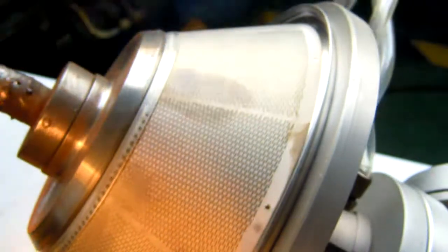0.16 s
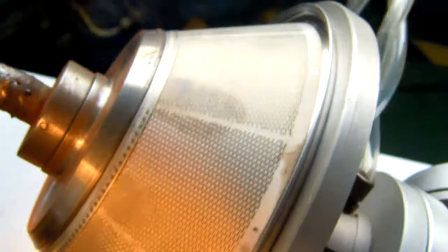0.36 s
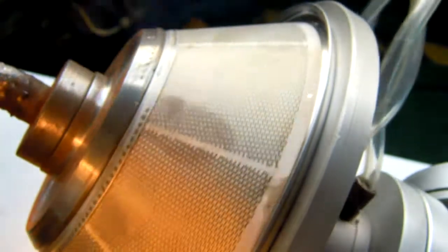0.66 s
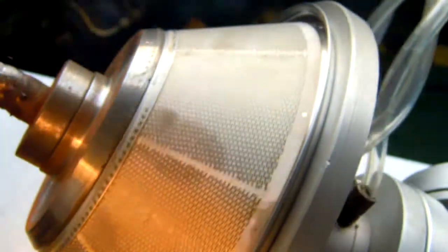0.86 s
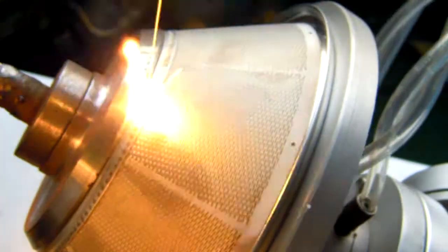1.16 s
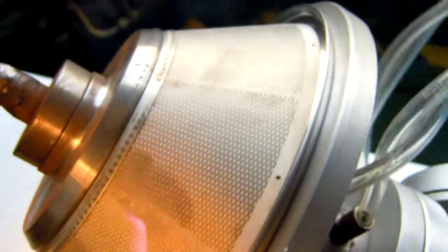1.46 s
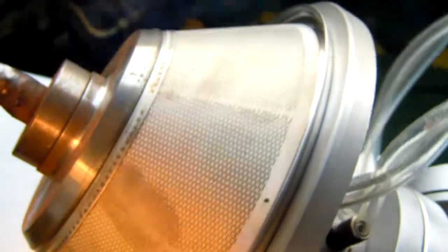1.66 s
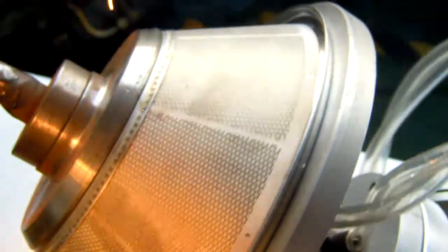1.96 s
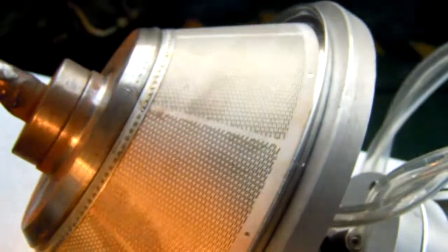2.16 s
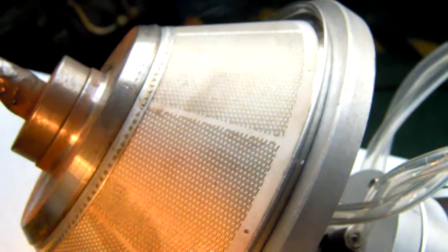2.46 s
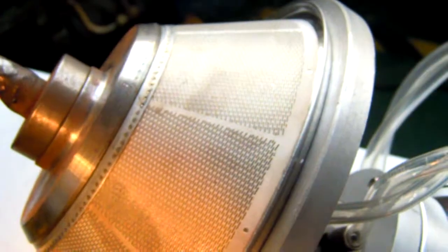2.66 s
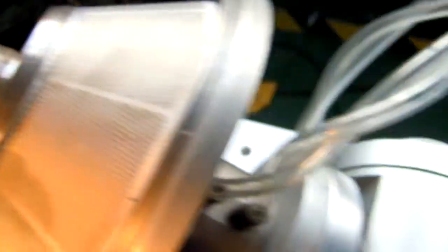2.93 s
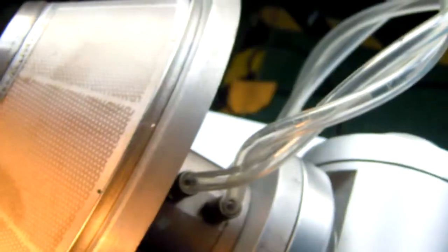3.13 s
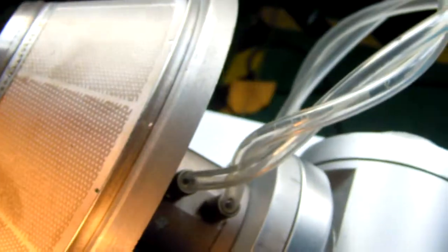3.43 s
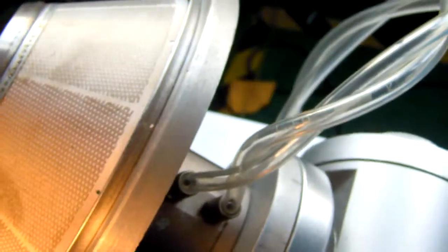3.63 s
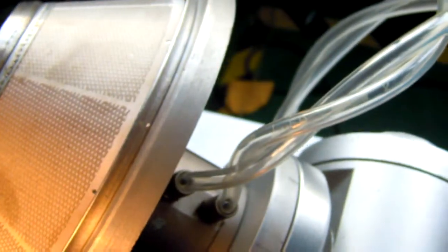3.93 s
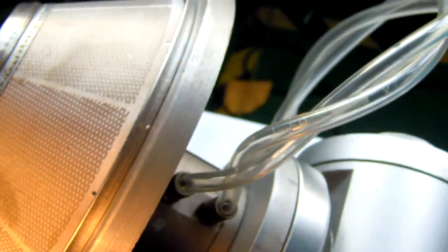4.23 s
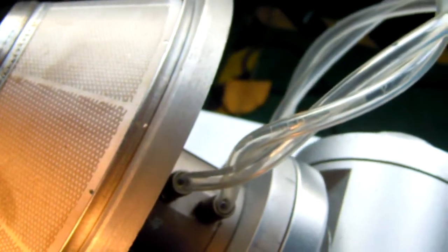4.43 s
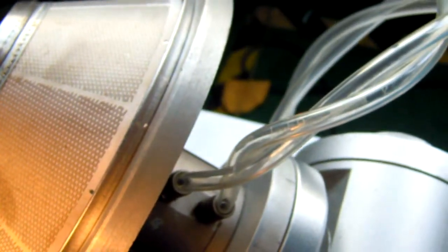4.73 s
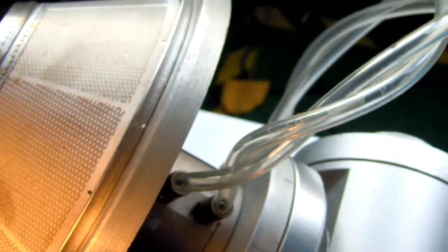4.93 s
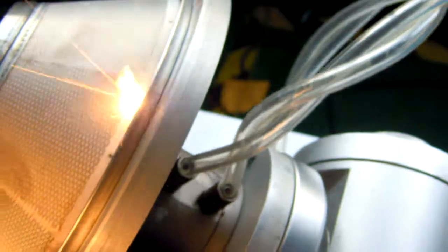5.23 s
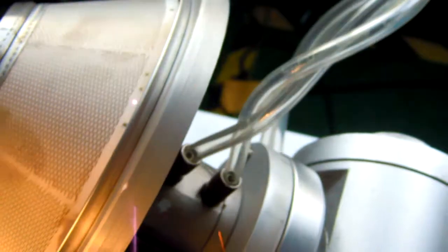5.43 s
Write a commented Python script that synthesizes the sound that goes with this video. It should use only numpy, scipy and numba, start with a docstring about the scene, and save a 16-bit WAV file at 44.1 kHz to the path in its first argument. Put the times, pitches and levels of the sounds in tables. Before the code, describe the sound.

A close mono microphone in a workshop hears a machine-gun-even run of dry, crisp welding snaps with the background pushed down. After a metallic clack, steady fan hum, a high thin whine and airy gas hiss grow louder, with soft low rumble and a few tiny metal clicks. Another clack, then three loud, distorted ticks with a bright metallic ring end it.

```python
"""Pulsed laser welding of a mesh cone

A laser welds a steel mesh cone close by: nine sharp ticks a second, noise bursts shaped by each beam pulse.
The shutter clacks shut; the gain control lifts the fans (tones, colored noise) and the comb-filtered gas hiss.
The shutter opens; the next ticks, on the cone's rim, ring brightly (noise bands, sines) and overload the input."""
import sys
import numpy as np
from scipy import signal
from scipy.fft import rfft, irfft, next_fast_len
from scipy.io import wavfile
from scipy.ndimage import uniform_filter1d, map_coordinates
from numba import njit

SR = 44100
rng = np.random.default_rng(int(sys.argv[2]) if len(sys.argv) > 2 else 0)


def wav_out(sig):
    """Save sig, one row per channel (or a flat mono array), as 16-bit PCM at SR to the path in sys.argv[1]."""
    wavfile.write(sys.argv[1], SR, np.round(np.clip(np.atleast_2d(sig).T, -1, 1) * 32767).astype(np.int16))


N = 246519
T = np.arange(N) / SR
SHOT_PERIOD_S = 0.107544

# welding runs, on the seam, then on the rim: (first shot [s], last shot [s], sizzle before its trim [dB],
# plume pop [dB], mesh ring [dB], rim ring [dB])
WELD_RUNS = [(0.0834, 2.019, 12, 10, -28, -2), (5.3437, 5.559, 10.5, -10, -2.5, 15.5)]


def amp(db):
    """Decibels to amplitude."""
    return 10 ** (np.asarray(db) / 20)


def unit(x):
    """x scaled to rms 1."""
    return x / np.sqrt(np.mean(x ** 2) + 1e-20)


def along(points, hz):
    """(Hz, value) points interpolated on a log frequency axis."""
    f, v = np.transpose(points)
    return np.interp(np.log(hz + 1), np.log(f + 1), v)


def wobble(rate):
    """Smooth random curve, rate knots a second."""
    return map_coordinates(rng.standard_normal(int(N * rate / SR) + 4), [T * rate])


def filtered(x, response):
    """x times a response of frequency."""
    m = next_fast_len(len(x) + 8192)
    spectrum = rfft(x, m) * response(np.fft.rfftfreq(m, 1 / SR))
    return irfft(spectrum, m)[:len(x)]


def noise(spectrum, size=N):
    """Noise of rms 1 with a (Hz, dB) color."""
    return unit(filtered(rng.standard_normal(size), lambda f: amp(along(spectrum, f))))


def band(hz, width, size):
    """Noise of rms 1 in one resonance; amplitude halves at width Hz off center."""
    return unit(filtered(rng.standard_normal(size), lambda f: 1 / (1 + ((f - hz) / width) ** 2)))


def add(track, s, sound):
    """Mix a sound into the track at time s."""
    part = track[max(round(s * SR), 0):][:len(sound)]
    part += sound[:len(part)]


def fade(t, t60):
    """Decay that loses 60 dB in t60 seconds; silent before time zero."""
    return (t >= 0) * np.exp(-np.log(1000) * np.abs(t) / t60)


def firing(first, last):
    """1 while the lamp is fed for a run of shots, else 0."""
    return (T > first - SHOT_PERIOD_S) & (T < last + SHOT_PERIOD_S / 2)


def load(lag_s):
    """Power drawn by the laser, 0-1, through a one-pole lag."""
    drawn = sum(firing(first, last) for first, last, *_ in WELD_RUNS)
    keep = np.exp(-1 / (lag_s * SR))
    return signal.lfilter([1 - keep], [1, -keep], drawn, zi=[keep * drawn[0]])[0]


def low_rumble():
    """Soft low rumble, steady with two swells: colored noise under Gaussian bumps."""
    # swells: (middle [s], length [s], level [dB])
    swells = [(2.477, 0.71, -31.5), (3.182, 0.075, -35)]
    steady_db = -44
    level = amp(steady_db)
    for s, length, db in swells:
        level = level + amp(db) * np.exp(-(2 * (T - s) / length) ** 2)
    return level * noise([(20, 0.5), (60, -5.0), (160, -5.5), (260, -10), (600, -30), (2000, -81.0)])


def machine():
    """Fans hum, whine and rush, sagging under load; cone and nozzle reflections comb the gas hiss."""
    # steady fan and pump tones: (frequency at idle [Hz], level relative to the others [dB])
    fan_tones = [(200.1, -40.5), (260.8, -37.5), (281.1, -39), (562.2, -40.5), (702.7, -41), (796, -43.5),
                 (843.2, -36), (1043.4, -46), (1090, -50), (1124.3, -42.5), (1452.9, -53.5), (2202, -47.5),
                 (2248.6, -56)]
    # color of the fans' air rush: (frequency [Hz], level [dB])
    rush_color = [(15, -35), (25, -12.5), (133, -11), (192, -6), (229, -10), (278, -1), (418, -10.5),
                  (571, -5.5), (750, -7.5), (826, -10), (893, -7), (1220, -11), (1370, -8), (1540, -11.5),
                  (2600, -24.5), (3380, -19), (5720, -120)]
    # color of the shield gas hiss: (frequency [Hz], level [dB])
    gas_color = [(900, -25), (2000, -1.5), (2550, -5), (3400, 1.5), (4460, -1.5), (6800, -4), (9100, -3),
                 (9600, -7.5), (10300, -14.5)]
    # whine level at idle: (time [s], level [dB])
    whine_level = [(2.75, -30), (3.1, -27), (4.25, -27), (4.5, -25.5), (5.1, -23)]
    idle_whine_hz, sag_hz, fan_lag_s = 1405.4, 6.4, 0.15
    hum_db, rush_db = 2.5, -28  # idle, near the nozzle
    hum_sag_db, whine_sag_db, rush_sag_db = -3.5, -1.5, -0.5  # change under full load
    # the microphone swings from the gas nozzle towards the fans
    drift_start_s, drift_end_s, fans_closer_db = 2.27, 3.6, 1.36
    gas_near_db, gas_far_db = -26.5, -28
    # reflection strength drops, so the hollow color of the hiss fades
    mirror_fade_s, mirror_strength = [3.3, 4], [0.38, 0.06]
    mirror_delay_s, mirror_above_hz = 0.00099, 3800  # the cone is too small to reflect longer waves

    sag = load(fan_lag_s)
    drift = np.clip((T - drift_start_s) / (drift_end_s - drift_start_s), 0, 1)

    whine_hz = idle_whine_hz - sag_hz * sag
    whine_db = np.interp(T, *np.transpose(whine_level)) + whine_sag_db * sag
    whine = amp(whine_db + 1.4 * wobble(7)) * np.sin(2 * np.pi * np.cumsum(whine_hz) / SR)

    clock_s = np.cumsum(whine_hz / idle_whine_hz) / SR  # all tones follow the fan speed
    hum = np.zeros(N)
    for hz, db in fan_tones:
        phase = 2 * np.pi * (hz * clock_s + rng.random()) + 0.1 * wobble(6)
        hum += amp(db + 1.5 * wobble(8.2)) * np.sin(phase)
    hum *= amp(hum_db + hum_sag_db * sag)
    rush = amp(rush_db + rush_sag_db * sag + 0.37 * wobble(12)) * noise(rush_color)
    fans = amp(fans_closer_db * drift) * (hum + rush)
    cabinet = amp(-36.5) * band(286.2, width=6.0, size=N)  # boom

    def reflect(f):
        """Inverted, delayed, high-passed."""
        treble = 1 - 1 / (1 + (f / mirror_above_hz) ** 10)
        return -np.exp(-2j * np.pi * f * mirror_delay_s) * treble

    jet = noise(gas_color)
    once = filtered(jet, reflect)
    twice = filtered(once, reflect)
    mirrored = np.interp(T, mirror_fade_s, mirror_strength)
    combed = (jet + mirrored * once + mirrored ** 2 * twice) / np.sqrt(1 + mirrored ** 2)
    gas = amp(gas_near_db + (gas_far_db - gas_near_db) * drift) * combed
    return fans + whine + cabinet + gas


def supply():
    """Thin tone of the laser's power supply while it feeds the lamp, swelling through each run."""
    tone_hz, start_db, swell_db_per_s = 797, -42.5, 6  # start_db holds at the first shot
    level = np.zeros(N)
    for first, last, *_ in WELD_RUNS:
        level += firing(first, last) * amp(start_db + swell_db_per_s * (T - first))
    tone = np.sin(2 * np.pi * tone_hz * T + 0.33 * wobble(4.8))
    return uniform_filter1d(level, size=SR // 20) * tone


def fixture():
    """Light metal clicks as the work is shifted: decaying noise bands."""
    # clicks: (time [s], level [dB], frequency [Hz], t60 [s])
    work_clicks = [(2.838, -23, 9270, 0.11), (3.092, -16, 8060, 0.045), (3.935, -20.5, 9180, 0.19),
                   (4.467, -27, 3800, .12), (4.469, -25.5, 6800, 0.11), (5.013, -26.5, 9210, 0.18)]
    out, t = np.zeros(N), np.arange(SR // 4) / SR
    for s, db, hz, t60 in work_clicks:
        add(out, s, amp(db - 60 * t / t60) * band(hz, width=340, size=len(t)))
    return out


def shutter():
    """The solenoid clicks, its blade thumps against the stop, rattles and rings."""
    # closing, then opening: (time [s], click before its trim [dB], rattle [dB],
    # rattle start after click [s], rattle hold [s], thump before its trim [dB], ring [dB])
    blade_moves = [(2.106, -5, -1, .011, 0.0051, 1, -24), (5.1358, -7, -9, .009, 0.0074, -33, -10)]
    # color of click and rattle: (frequency [Hz], level [dB])
    clack_color = [(200, -31), (1200, -12), (1750, -4), (2500, -17), (3600, -4), (4800, -11), (5900, -0.5),
                   (7000, -4.5), (8400, 1.5), (10000, -3.5)]
    travel_s, click_trim_db, thump_trim_db = 0.007, 2.5, -10.0
    click_t60_s, thump_t60_s, rattle_t60_s, ring_t60_s = 0.05, 0.12, 0.18, 0.28
    out, t = np.zeros(N), np.arange(SR // 3) / SR
    for s, click_db, rattle_db, start, length, thump_db, ring_db in blade_moves:
        click_level = amp(click_db + click_trim_db - 60 * t / click_t60_s)
        add(out, s, click_level * noise(clack_color, size=len(t)))
        thump_level = amp(thump_db + thump_trim_db - 60 * t / thump_t60_s)
        add(out, s + travel_s, thump_level * band(200, width=380, size=len(t)))
        after = np.maximum(t - length, 0)
        rattle = amp(rattle_db - 60 * after / rattle_t60_s) * noise(clack_color, size=len(t))
        ring = amp(ring_db - 60 * after / ring_t60_s) * band(8430, width=340, size=len(t))
        add(out, s + start, rattle + ring)
    return out


def flash(t, boil_s, snap_db):
    """Shot envelope: snap, rise to the boil, hold while the beam lasts, collapse with a short afterglow."""
    beam_s, snap_t60_s, collapse_t60_s = 0.0073, 0.0023, 0.0026
    cold_db, afterglow_db, afterglow_t60_s = -29.5, -9.5, 0.011  # re the boil
    after = np.maximum(t - beam_s, 0)
    heating = amp(cold_db * np.maximum(1 - t / boil_s, 0))
    afterglow = amp(afterglow_db) * fade(after, afterglow_t60_s)
    cooling = np.maximum(fade(after, collapse_t60_s), afterglow)
    return amp(snap_db) * fade(t, snap_t60_s) + heating * cooling


def puff(source, shape):
    """Source under an envelope, with the envelope's energy however the noise flutters."""
    shaped = source * shape
    return shaped * np.linalg.norm(shape) / np.linalg.norm(shaped)


def varied(db, scatter_db):
    """Amplitude with normal scatter in dB."""
    return amp(db + scatter_db * rng.normal())


def laser():
    """Each timed shot boils off metal that sizzles and pops; mesh and rim ring after it."""
    # color of the boiling metal: (frequency [Hz], level [dB])
    sizzle_color = [(100, -14.5), (700, -28), (1500, -14), (2500, -22), (4400, -5), (5200, -12.5),
                    (5800, 2.5), (6400, 3.5), (7300, -4.5), (8300, 5), (9200, -4.5), (9700, -7),
                    (11000, -7.5)]
    # dense mode clusters of the mesh: (frequency [Hz], half-width [Hz], relative level [dB], t60 [s])
    mesh_modes = [(3420, 300, -14.5, 0.15), (5130, 1150, -6.5, 0.21), (5800, 240, -22, 0.14),
                  (7350, 250, -5.5, 0.24), (8200, 250, 10.5, 0.052), (9400, 390, 5.5, 0.073),
                  (9340, 260, -11, 0.4)]
    # clean modes of the solid rim: (frequency [Hz], relative level [dB])
    rim_modes = [(4495, -39), (5319, -37), (6433, -30), (7262, -38), (7467, -23), (8080, -36), (8629, -27),
                 (8872, -39), (9362, -33), (9491, -40)]
    sizzle_trim_db, sizzle_scatter_db, pop_scatter_db = 2.5, 1.5, 0.9
    pop_hz, pop_scatter_hz, pop_width_hz = 3160, 99, 493  # vapor plume resonance
    rim_t60_s, ring_attack_s = 0.22, 0.0016
    mode_scatter_db = 1.5  # each shot lands on a new spot

    out, t = np.zeros(N), np.arange(SR // 6) / SR
    sizzle_shape = amp(sizzle_trim_db) * flash(t, boil_s=0.0023, snap_db=-4.5)
    pop_shape = flash(t, boil_s=0.004, snap_db=-19)
    for first, last, sizzle_db, pop_db, mesh_db, rim_db in WELD_RUNS:
        for s in np.arange(first, last + SHOT_PERIOD_S / 2, SHOT_PERIOD_S):
            boiling = noise(sizzle_color, size=len(t))
            sizzle = varied(sizzle_db, sizzle_scatter_db) * puff(boiling, sizzle_shape)
            plume = band(pop_hz + pop_scatter_hz * rng.normal(), pop_width_hz, size=len(t))
            pop = varied(pop_db, pop_scatter_db) * puff(plume, pop_shape)
            mesh, rim = np.zeros(len(t)), np.zeros(len(t))
            for hz, width, db, t60 in mesh_modes:
                cluster = puff(band(hz, width, size=len(t)), fade(t, t60))
                mesh += varied(db, mode_scatter_db) * cluster
            for hz, db in rim_modes:
                mode = np.sin(2 * np.pi * (hz * t + rng.random()))
                rim += varied(db, mode_scatter_db) * mode
            rim *= fade(t, rim_t60_s)
            attack = 1 - np.exp(-t / ring_attack_s)
            ring = (amp(mesh_db) * mesh + amp(rim_db) * rim) * attack
            add(out, s, sizzle + pop + ring)
    return out


def workshop(x):
    """Reverb of near surfaces, then a far wall: decaying noise tails, redrawn every 0.2 s."""
    near_delay_s, near_t60_s = 0.0022, 0.12
    wall_delay_s, wall_t60_s, wall_db = 0.06, 0.12, -14.5  # level re the near surfaces
    t = np.arange(SR // 4) / SR
    near = fade(t - near_delay_s, near_t60_s)
    wall = amp(wall_db) * fade(t - wall_delay_s, wall_t60_s)
    strength = np.hypot(near, wall)
    out, hop = np.zeros(N), SR // 5
    for i in range(0, N, hop):
        tail = strength * rng.standard_normal(len(t))
        add(out, i / SR, signal.fftconvolve(x[i:i + hop], tail / np.linalg.norm(tail)))
    return out


def scene():
    """Shots and shutter in the room, over the running machine."""
    room_db = -19.5
    background = low_rumble() + machine() + supply() + fixture()
    hits = shutter() + laser()
    return (background + hits + amp(room_db) * workshop(hits))[None]


@njit
def gain_control(over, start, attack, hold, release):
    """Gain in dB: pushed down by whatever passes the threshold, held, then let back up (times in samples)."""
    gain, g, wait = np.empty(len(over)), start, hold
    for i in range(len(over)):
        if over[i] + g > 0:
            g -= (over[i] + g) / attack
            wait = hold
        elif wait > 0:
            wait -= 1
        else:
            g -= g / release
        gain[i] = g
    return gain


def record(dry):
    """Gain control, already turned down by the welding, then overload, preamp rumble and a steep low-pass."""
    threshold_db, start_db = -4.5, -25.5
    attack_s, hold_s, release_s = 0.07, 0.21, 0.28
    overload_level, top_hz = 0.65, 10080
    over_db = 20 * np.log10(np.abs(dry[0]) + 1e-9) - threshold_db
    gain_db = gain_control(over_db, float(start_db), attack_s * SR, hold_s * SR, release_s * SR)
    x = dry[0] * amp(gain_db)
    x = x / (1 + (np.abs(x) / overload_level) ** 4) ** (1 / 4)
    rumble = noise([(20, -0.5), (55, 0.5), (100, -18), (250, -16.5), (1000, -40), (10000, -60)])
    x = x + amp(-52.5) * rumble
    return filtered(x, lambda f: 1 / np.sqrt(1 + (f / top_hz) ** 130))[None]


dry = scene()
out = record(dry)
wav_out(out)
```